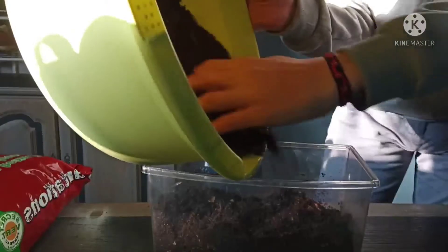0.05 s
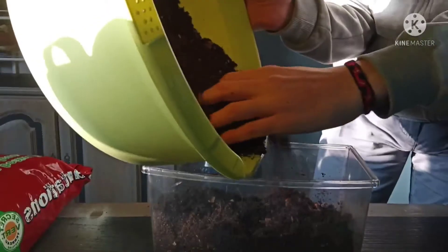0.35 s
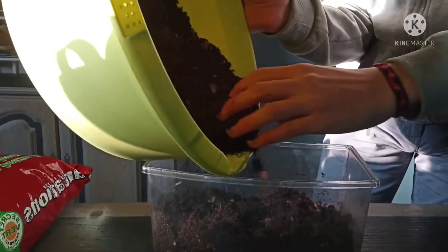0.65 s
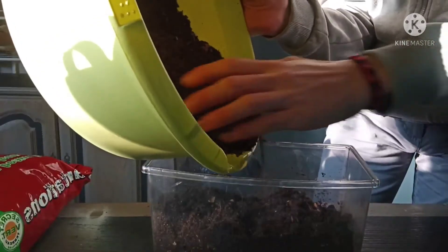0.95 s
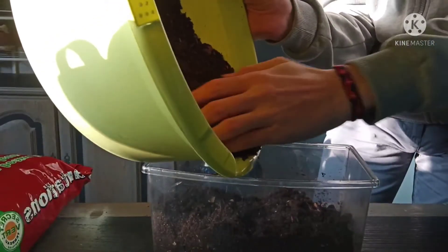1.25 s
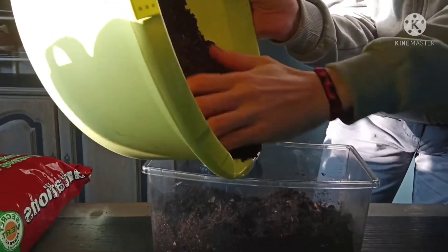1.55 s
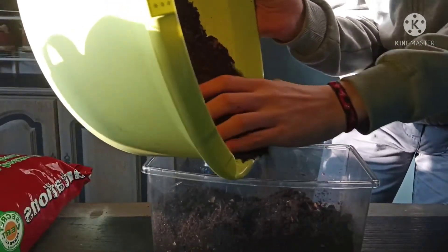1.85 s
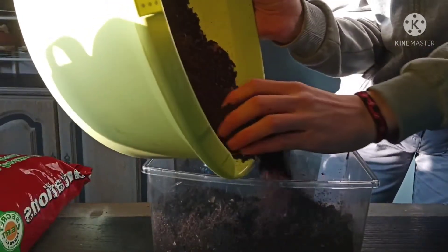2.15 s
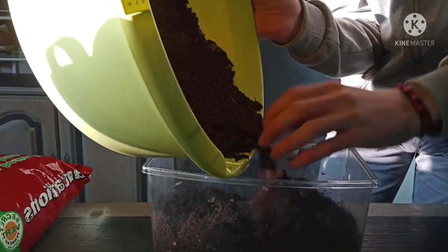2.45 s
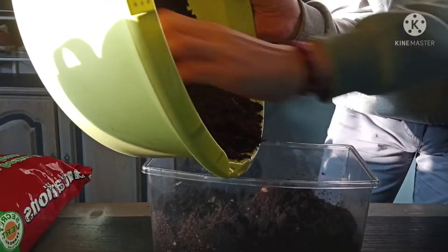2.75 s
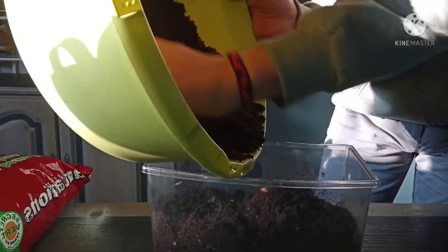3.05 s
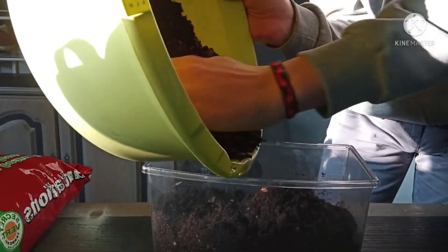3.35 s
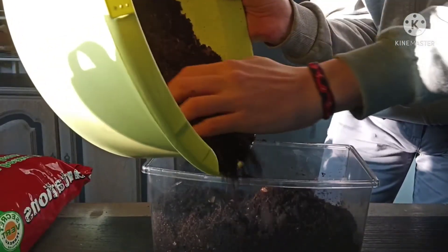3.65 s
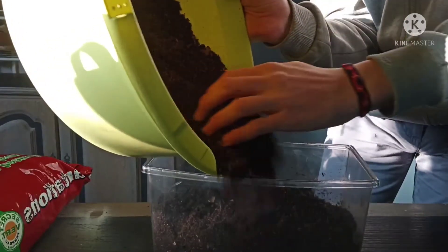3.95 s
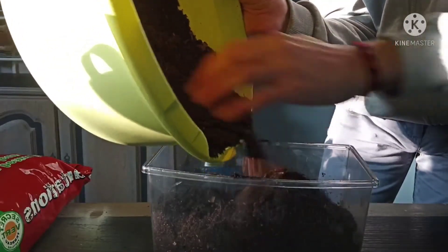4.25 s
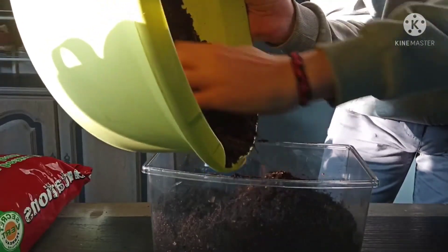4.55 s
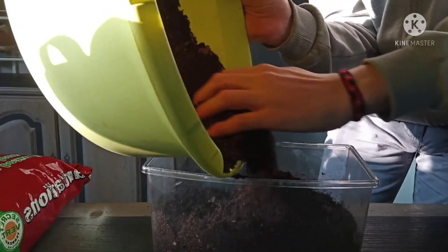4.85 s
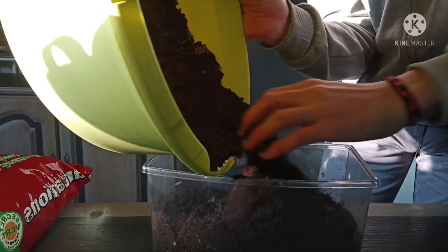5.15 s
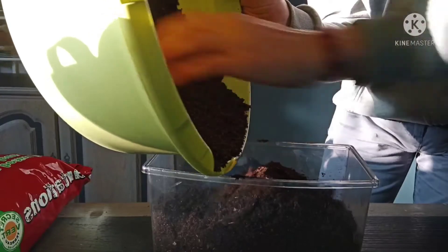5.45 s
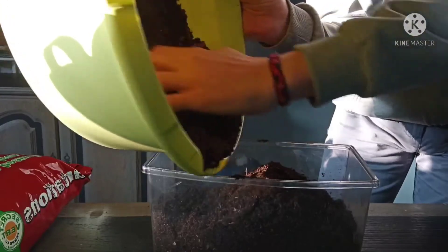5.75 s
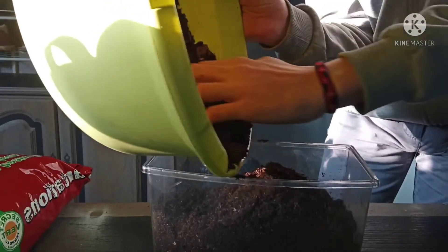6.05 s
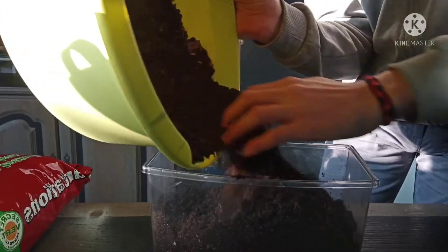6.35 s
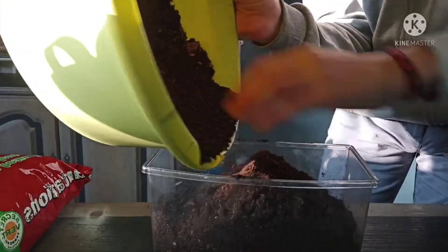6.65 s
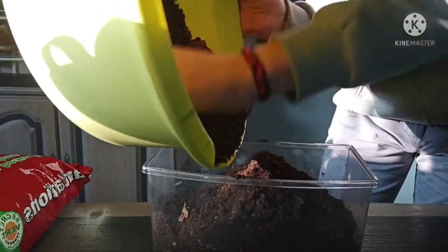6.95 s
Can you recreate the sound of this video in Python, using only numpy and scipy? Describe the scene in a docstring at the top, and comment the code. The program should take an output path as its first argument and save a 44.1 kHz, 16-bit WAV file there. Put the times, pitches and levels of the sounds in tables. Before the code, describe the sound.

In the first 0.3 seconds a plastic basin clatters against a plastic tub in a quick cluster of hollow knocks, the loudest moment, with a low rub and a rush of loose potting soil. A few thuds and ticks follow. From about 0.7 to 3 seconds it is quiet: fingers rub softly in the soil, crumbs patter down in small slides, and grit ticks on the plastic. Around 3.1 seconds a dull thud starts a brief hissing slide, followed by more rubbing, trickling and scattered light taps. At 5.7 seconds comes a stronger, ringing thump with a sharp tap, then a run of softer thuds and falling crumbs until 6.2. More taps follow near 6.7 and 6.9, and another dull thud and small slide at 7.1. Everything sounds close, in a small room with a short echo and faint, steady house rumble.

```python
"""A hand rakes loose potting soil out of a tilted plastic basin into a plastic tub in a small room.
The fingers rub and thud in the soil, and crumbs and dust patter down as thousands of tiny impacts.
Bits of bark and grit tick on the plastic walls and make them ring. At the start the basin clatters
against the tub. The house rumbles faintly behind it all."""
import sys
import numpy as np
from scipy import signal
from scipy.fft import rfft, irfft
from scipy.io import wavfile
from scipy.ndimage import uniform_filter1d

SR = 44100
rng = np.random.default_rng(int(sys.argv[2]) if len(sys.argv) > 2 else 0)


def pcm_store(signal):
    """Save signal as 16-bit PCM."""
    levels = np.round(np.clip(np.atleast_2d(signal), -1, 1) * 32767)
    wavfile.write(sys.argv[1], SR, levels.astype(np.int16).T)


N = 317951
TIME = np.arange(N) / SR


def undb(db):
    """Turn decibels into a factor to multiply by."""
    return 10 ** (np.asarray(db) / 20)


def unit(x):
    """Scale a signal to an average (rms) level of 1."""
    return x / np.sqrt(np.mean(x ** 2))


def colour(x, points, size=4096):
    """Shape the tone of a sound along a curve of (Hz, dB) points."""
    hz, db = np.transpose(points)
    bin_hz = np.arange(size // 2 + 1) * SR / size + 1
    gain = undb(np.interp(np.log(bin_hz), np.log(hz), db))
    # build the filter so that nothing sounds ahead of its cause
    cepstrum = irfft(np.log(gain))
    cepstrum[1:size // 2] *= 2
    cepstrum[size // 2 + 1:] = 0
    response = irfft(np.exp(rfft(cepstrum)))[:size // 2]
    return signal.oaconvolve(np.atleast_2d(x), response[None], axes=1)[:, :N]


def cut(x, hz, kind, order):
    """Keep the "low" or the "high" side of a cutoff; a higher order cuts more steeply."""
    return signal.lfilter(*signal.butter(order, min(hz, SR / 2 - 1000), kind, fs=SR), x)


def ring(x, modes, size=12000):
    """A blow plus the tones it sets ringing; the narrower a tone, the longer it lasts."""
    t = np.arange(size) / SR
    response = np.zeros(size)
    for hz, width, db in modes:
        strength = undb(db) * 2 * np.pi * width / SR
        response += strength * np.exp(-np.pi * width * t) * np.cos(2 * np.pi * hz * t)
    response[0] += 1  # the blow itself
    return signal.oaconvolve(x, response[None], axes=1)[:, :N]


def flex(x, hz, width_hz):
    """A bending wall holds back the waves near its own pitch, which smears a blow in time."""
    b, a = signal.iirpeak(hz, hz / width_hz, fs=SR)
    return x - 2 * signal.lfilter(b, a, x)


def add(out, s, sound, db, pan_db):
    """Mix in a contact at s seconds; db is its level as if it lasted 10 ms, pan_db is left minus right."""
    start = int(s * SR)
    sound = (sound * undb(db) * np.sqrt(SR / 50 / np.sum(sound ** 2)))[:, :N - start]
    out[:, start:start + sound.shape[1]] += undb([[pan_db / 2], [-pan_db / 2]]) * sound


def crumble(decay_s, rise_s=0.0014, apart_hz=380, size=2048):
    """A short dying burst of tiny cracks; left and right differ mainly above apart_hz."""
    t = np.arange(size) / SR
    mid, side = rng.standard_normal((2, size))
    side = cut(side, apart_hz, "high", order=2)
    burst = np.array([mid + side, mid - side]) * np.exp(-t / decay_s) * (1 - np.exp(-t / rise_s))
    return burst / np.sqrt(np.sum(burst ** 2) / 2)


def push(high_hz, order, size=2048):
    """The pulse of one contact: the softer the contact, the lower its cutoff."""
    return cut(signal.unit_impulse(size), high_hz, "low", order=order)


def grains(per_s, spread_db, lag_s):
    """Countless small impacts of uneven size, each reaching left and right at slightly different times."""
    count = int(per_s * N / SR)
    when, size, sign, side = rng.random((count, 4)).T
    size = undb(-spread_db * np.log(size + 1 / 200)) * np.sign(sign - .5)  # many small, few large
    at = (when * N).astype(int)
    lag = np.round((2 * side - 1) * lag_s * SR).astype(int)
    return unit(np.array([np.bincount(at, size, N), np.bincount((at + lag) % N, size, N)]))


def surge(per_s):
    """A smooth random wobble with a typical size of 1."""
    hold = int(SR / per_s)
    steps = np.repeat(rng.standard_normal(N // hold + 1), hold)[:N]
    return unit(uniform_filter1d(steps, hold))


def swell(t, s, rise_s, fall_s):
    """The power of a movement that builds to a peak at s seconds and dies away."""
    return np.exp(np.where(t < s, -((t - s) / rise_s) ** 2, -2 * np.abs(t - s) / fall_s))


def strays(per_s, size=256):
    """Chance contacts: their times, and random offsets for level, pitch and place."""
    wait = rng.gamma(2, 1 / 2, size)
    offsets = np.clip(rng.standard_normal((size, 3)), -2, 2)
    s = np.cumsum(wait) / per_s
    inside = s < TIME[-2]
    return s[inside], *offsets[inside].T


def room_noise(level_db=-66.5, side_db=-7):
    """The faint steady rumble and hiss of the house."""
    # The tone of the noise. Each row: frequency in Hz, relative level in dB.
    tone = [(20, -30), (45, -18), (100, 2.5), (200, -0.5), (400, -5.5), (700, -10.5), (1500, -24),
            (3000, -24), (6000, -32.5), (15500, -33.5)]
    mid, side = rng.standard_normal((2, N))
    noise = mid + undb(side_db) * np.array([side, -side])
    return undb(level_db) * unit(colour(noise, tone))


def room(x, gap_s=0.0029, alike_hz=550):
    """The walls add a short, dense echo; its low notes reach left and right alike."""
    # The echo. Each row: frequency in Hz, seconds to fade by 60 dB, level in dB against the direct sound.
    bands = [(92, 0.55, -13), (200, 0.18, -4.5), (450, 0.2, -3), (1010, .34, -7.5), (2175, 0.18, -3.5),
             (4500, 0.19, -4), (9000, 0.11, -3), (14000, .22, -5)]
    t = TIME[:SR // 2]
    hz = np.arange(len(t) // 2 + 1) * SR / len(t) + 1
    mid, side = rfft(rng.standard_normal((2, len(t))))
    spread = np.pi / 4 * hz / np.hypot(hz, alike_hz)
    noise = mid * np.cos(spread) + np.array([side, -side]) * np.sin(spread)
    centres = np.log([row[0] for row in bands])
    tail = 0
    for share, (_, fade_s, db) in zip(np.eye(len(bands)), bands):
        fade = 1000 ** (-t / fade_s) * (t > gap_s)
        band = irfft(noise * np.interp(np.log(hz), centres, share), len(t))
        tail = tail + undb(db) * band * fade / np.sqrt(np.sum(fade ** 2))
    return x + signal.oaconvolve(x, tail, axes=1)[:, :N]


def knocks(gain_db=-2, left_hz=470, right_hz=520):
    """The basin knocks on the tub: each contact rattles, bends the wall and makes the basin ring."""
    # The knocks. Each row: start in seconds, level in dB, low and high cutoff in Hz, pan in dB.
    hits = [(.0785, -20, 290, 470, 1.5), (.096, -20, 197, 690, 0), (.106, -17, 240, 500, -2.5),
            (.116, -25.5, 90, 379.4, 2.5), (.125, -27.5, 90.5, 554, 2.5), (.211, -18.5, 309, 570, -1),
            (.229, -25.5, 200, 566, 3), (.243, -30, 310, 525, 0.5), (.316, -37, 120, 760, -5)]
    # The basin's ringing tones. Each row: pitch in Hz, width in Hz, level in dB against the blow.
    basin_tones = [(135, 15, 12.5), (158, 16, 13), (262, 9.6, -4), (414, 24, 1.5), (445, 52, 8),
                   (560, 18, 6), (682, 34, 8), (770, 11, 3.5), (825, 22, 1.5), (978, 54, 6.5),
                   (1157, 21, 13.5), (1380, 14, 8), (1534, 7.9, 12), (2640, 29, 13.5)]
    out = np.zeros((2, N))
    for s, db, low_hz, high_hz, pan_db in hits:
        rattle = cut(crumble(decay_s=0.01, rise_s=0.004), high_hz, "low", order=2)
        blow = push(high_hz, order=3) + rattle
        add(out, s, cut(blow, low_hz, "high", order=2), db + gain_db, pan_db)
    # left and right face different parts of the wall
    out = np.array([flex(x + 1e-18, hz, width_hz=300) for x, hz in zip(out, (left_hz, right_hz))])
    return ring(cut(out, 140, "high", order=2), basin_tones)


def trickle_db(t):
    """How strongly soil trickles over the rim at time t, in dB."""
    # The trickle. Each row: time in seconds, level in dB.
    levels = [(0, -58.5), (.55, -65.5), (.85, -76), (1.55, -74), (1.8, -72), (2.1, -80), (2.38, -66.5),
              (2.75, -77), (3.1, -69), (3.55, -67), (3.95, -66.5), (4.15, -70.5), (4.42, -66), (4.6, -77.5),
              (4.95, -76), (5.15, -69), (5.85, -70.5), (6.25, -74), (7.21, -73.5)]
    return np.interp(t, *np.transpose(levels))


def grit(above_db=4, spread_db=0.5, hz=7450, octaves=0.76, crack_db=-5, pan_db=-1):
    """Stray grit hits the walls at random, louder when the trickle is stronger; gives rows for ticks()."""
    s, size, pitch, place = strays(per_s=9.9)
    db = trickle_db(s) + above_db + spread_db * size
    return list(zip(s, db, hz * 2 ** (octaves * pitch), np.full(len(s), crack_db), pan_db * place))


def ticks(gain_db=-3, crack_hz=13000, scatter_db=7):
    """Hard bits and nails tap the plastic; each tap scatters between the walls, with a crack on top."""
    # The taps. Each row: start in seconds, level in dB, high cutoff in Hz, crack in dB, pan in dB.
    taps = [(.0957, -33, 3540, -26, 10), (.104, -35, 3650, -10, -16.5), (0.2091, -33.5, 3030, -28, -14),
            (0.315, -41, 2650, 0.5, -14), (.47, -30, 3250, -27, -2), (0.609, -48.5, 1900, -34, -1),
            (2.318, -48.5, 3720, -13.5, -2), (2.569, -41.5, 1950, -34, -10), (2.577, -41, 1430, -18, 0),
            (2.626, -51, 1210, -31, 4.5), (2.675, -53.5, 3430, -6.5, -9), (3.247, -41.5, 3100, -33, 5),
            (3.773, -43.5, 4470, -8.5, -3), (3.845, -49.5, 4300, 2.5, -5), (3.94, -46, 2340, -9, -1),
            (4.282, -52.5, 14500, -20, 7.5), (4.328, -59, 12400, 22, 7), (4.345, -54, 3450, -8, -2),
            (4.451, -48, 14000, -4, 1.5), (4.915, -64, 12000, -1, -2), (5.132, -58, 4400, -1, 0),
            (5.337, -63, 12500, 1.5, 5.5), (5.357, -60, 2380, -25, 3), (5.476, -50.5, 3700, -4.5, -3),
            (5.551, -55.5, 2800, 7, 1.5), (5.68, -52.5, 1540, -24, -2), (5.722, -33, 1830, -22.5, -1.5),
            (5.906, -35, 2700, -10.5, -2.5), (6.009, -52, 1520, -29, 1), (6.109, -60.5, 2400, -4, -1),
            (6.476, -45.5, 1790, -20, -3), (6.577, -53, 3600, -1, -2.5), (6.602, -49, 1310, -28, 7),
            (6.7259, -36, 2840, -25, -3), (6.926, -36.5, 2160, -27, 2)]
    # The thin tub wall's tones. Each row: pitch in Hz, width in Hz, level in dB against the blow.
    tub_tones = [(421, 61, 0.5), (1340, 60, -5.5), (1594, 55, 2.5), (2445, 120, -7), (3360, 90, -2.5),
                 (4660, 130, -4)]
    out = np.zeros((2, N))
    for s, db, high_hz, crack_db, pan_db in taps + grit():
        scatter = cut(crumble(decay_s=0.0023, rise_s=0.0003), high_hz, "low", order=5)
        tap = push(high_hz, order=5) + undb(scatter_db) * scatter
        crack = undb(crack_db) * cut(crumble(decay_s=0.0023, rise_s=0.0005), crack_hz, "low", order=2)
        low_hz = 560 * (high_hz / 3000) ** 1.15  # a harder tick has less bass
        add(out, s, cut(tap + crack, low_hz, "high", order=2), db + gain_db, pan_db)
    return ring(out, tub_tones)


def rub_strength(t, resting_db=-79.5):
    """How strongly things rub at time t: at the start the basin scrapes on the tub, later the hand or the
    shifting soil rubs; even a resting hand rubs a little."""
    # The strokes; the first is the basin scraping on the tub, the rest are the hand's. Each row: peak time,
    # rise and fall in seconds, level in dB.
    strokes = [(.19, .07, 0.1, -36.5), (.5, .03, 0.15, -54.5), (1.42, .11, 0.32, -61),
               (2.55, .035, 0.047, -59), (3.3, .25, 0.64, -64), (5.06, 0.035, .07, -63.5),
               (5.598, 0.067, 0.17, -59.5), (5.941, .025, 0.11, -54.5), (7.15, .15, 0.22, -78)]
    power = sum(undb(db) ** 2 * swell(t, s, rise_s, fall_s) for s, rise_s, fall_s, db in strokes)
    return np.sqrt(undb(resting_db) ** 2 + power)


def clods(above_db=6.5, spread_db=6, max_db=-54, hz=430, octaves=0.16, pan_db=2):
    """Small clods give way at random, louder when the hand rubs harder; gives rows for thuds()."""
    s, size, pitch, place = strays(per_s=9)
    db = np.minimum(20 * np.log10(rub_strength(s)) + above_db + spread_db * size, max_db)
    return list(zip(s, db, hz * 2 ** (octaves * pitch), pan_db * place))


def thuds(gain_db=-1, crunch_hz=2000, damping=0.35, soft_db=-50, full_ring_db=-20):
    """Fingers and clods push on the soil-laden wall; the soil crunches, and hard pushes ring the most."""
    # The pushes. Each row: start in seconds, level in dB, high cutoff in Hz, pan in dB.
    pushes = [(.006, -37, 437, -1.5), (0.063, -38.5, 490, 3), (.315, -36.5, 405, 0),
              (0.469, -45.5, 577, -2), (0.528, -46.5, 710, 2), (0.737, -50.5, 373, 1.5),
              (1.25, -54, 444, -2.5), (1.349, -51.5, 380, -6), (1.378, -53.5, 254, 2),
              (1.424, -50.5, 510, 1), (1.505, -56, 408, -4.5), (1.781, -57, 670, 3), (1.922, -53, 864, 4.5),
              (1.938, -56.5, 460, -2.5), (2.952, -58, 276, 2.5), (3.078, -36.5, 286, 3),
              (3.191, -44.5, 370, 1.5), (3.384, -46, 395, .5), (3.885, -51.5, 261, 1),
              (4.319, -54, 507, -2), (4.576, -58, 400, 5.5), (4.903, -45.5, 455, 0), (5.082, -50, 517, 1),
              (5.105, -55, 522, -2), (5.179, -50.5, 538, 0), (5.58, -47.5, 214, 0), (5.7218, -23, 410, -4),
              (5.757, -32, 416, 1.5), (5.906, -41, 307, 0.5), (5.957, -41.5, 474, 0.5),
              (6.007, -46, 414, -2), (6.028, -48, 370, -5), (6.07, -43.5, 457, -1), (6.161, -47.5, 440, 0),
              (6.602, -48, 597, -1), (6.726, -47.5, 530, -3), (7.094, -30, 290, 3.5)]
    # The laden wall's tones. Each row: pitch in Hz, width in Hz, level in dB against the blow.
    wall_tones = [(200, 14, 4.5), (246.7, 5.2, 6), (281, 4, 0.5), (369, 8.3, 2), (409, 17, 9.5),
                  (540, 14, 6)]
    dull, ringing = np.zeros((2, 2, N))
    for s, db, high_hz, pan_db in pushes + clods():
        firmness_db = db - soft_db
        low_hz = 129 * 2 ** (0.03 * firmness_db)  # a firmer push is shorter, so it has less bass
        crunch = undb(-23.5 + 0.1 * firmness_db) * cut(crumble(decay_s=0.0077), crunch_hz, "low", order=2)
        blow = cut(push(high_hz, order=5) + crunch, low_hz, "high", order=3)
        thud = flex(blow, high_hz, width_hz=190)
        add(dull, s, thud, db + gain_db, pan_db)
        add(ringing, s, thud, db + gain_db + damping * (db - full_ring_db), pan_db)
    return dull + ring(ringing, wall_tones) - ringing  # subtract so that each blow sounds only once


def raked_soil(rub_db=2, patter_db=0.5, fine_db=-6, sift_hz=3500):
    """The basin scrapes on the tub at the start, then the hand rubs in fits and starts; crumbs and dust fall in
    small slides and in a thin trickle."""
    # The tones of the low rub, the crumbs and the hissing dust. Each row: frequency in Hz, level in dB.
    rub_tone = [(30, -25.5), (60, -8.5), (105, -1.5), (160, 3.5), (260, -8.5), (400, -3), (600, -11),
                (1000, -16.5), (3000, -48)]
    crumb_tone = [(200, -15), (500, -5.5), (800, 0.5), (1600, 2), (2600, -2.5), (3400, -5.5), (4500, -15),
                  (7000, -22.5), (12000, -36.5)]
    dust_tone = [(1500, -12.5), (3500, 1.5), (4600, 2), (6500, -0.5), (9000, -0.5), (12000, -1.5),
                 (15500, -7)]
    # Slides of soil. Each row: peak time, rise and fall in seconds, crumb level and dust level in dB.
    slides = [(0.111, 0.016, 0.065, -46, -46.5), (.2, .03, 0.018, -66, -53), (.33, 0.022, 0.044, -46, -58),
              (0.741, 0.034, 0.04, -63.5, -74.5), (1.346, 0.03, .036, -58, -64),
              (1.66, .054, 0.23, -63, -71), (2.06, 0.058, .22, -63.5, -67.5), (2.57, 0.05, 0.12, -67, -70),
              (2.901, 0.043, 0.25, -87, -75), (3.076, 0.0076, 0.021, -55.5, -63.5),
              (3.126, .008, 0.027, -51.5, -54), (3.222, 0.028, 0.066, -50.5, -50),
              (3.96, 0.015, 0.047, -56.5, -68), (5.04, 0.011, .088, -68, -76),
              (5.745, 0.0071, .033, -64, -68), (5.804, 0.02, 0.014, -49.5, -58),
              (6.01, 0.027, 0.028, -65, -70.5), (6.55, 0.096, 0.13, -69, -69),
              (6.96, 0.014, 0.056, -61.5, -78), (7.131, .025, 0.1, -60.5, -57)]
    trickle = undb(trickle_db(TIME))
    crumb_power = (trickle * undb(patter_db)) ** 2
    dust_power = np.zeros(N)
    for s, rise_s, fall_s, crumb_db, dust_db in slides:
        slide = swell(TIME, s, rise_s, fall_s)
        crumb_power += undb(crumb_db) ** 2 * slide
        dust_power += undb(dust_db) ** 2 * slide
    uneven_flow = undb(1.2 * surge(per_s=45))
    rub = unit(colour(grains(per_s=720, spread_db=3, lag_s=0.0001), rub_tone))
    crumbs = unit(colour(grains(per_s=3200, spread_db=4, lag_s=0.00027), crumb_tone))
    dust = unit(colour(grains(per_s=6000, spread_db=4.5, lag_s=0.0003), dust_tone))
    fine_dust = colour(grains(per_s=3000, spread_db=0.5, lag_s=0.00033), dust_tone)
    fine_dust = unit(cut(fine_dust, sift_hz, "high", order=1))  # the trickle sifts out the finest dust
    rubbing = rub * rub_strength(TIME) * undb(rub_db + 0.5 * surge(per_s=25))
    falling = crumbs * np.sqrt(crumb_power) + dust * np.sqrt(dust_power)
    sifting = fine_dust * trickle * undb(fine_db)
    return rubbing + uneven_flow * (falling + sifting)


def scene():
    """Basin, tub and soil in the room."""
    return room(knocks() + thuds() + ticks() + raked_soil()) + room_noise()


def record(dry, rumble_hz=35, top_hz=15750):
    """Each of two microphones colours the treble its own way; the deepest and highest sounds are cut."""
    # The microphones' tone. Each row: frequency in Hz, left gain in dB, right gain in dB.
    mic_tone = [(3000, 1, 0.5), (5050, -1.5, 0), (6614, -0.5, 4), (8300, -2.5, -2.5), (11000, 4, -3.5),
                (11300, 6, -4.5), (11800, 9.5, -3), (13300, 8, -4), (15500, 4.5, -1)]
    hz, left_db, right_db = np.transpose(mic_tone)
    heard = np.vstack([colour(x, np.column_stack([hz, db])) for x, db in zip(dry, (left_db, right_db))])
    heard = cut(heard, rumble_hz, "high", order=2)
    return signal.sosfilt(signal.ellip(10, .2, 70, top_hz, fs=SR, output="sos"), heard)


dry = scene()
out = record(dry)
pcm_store(out)
```